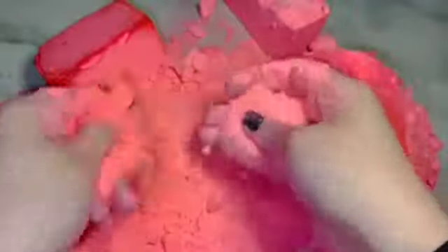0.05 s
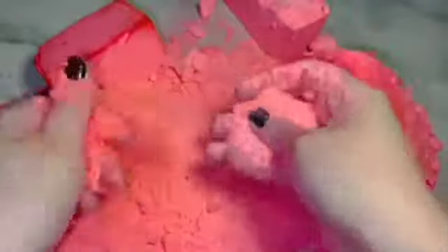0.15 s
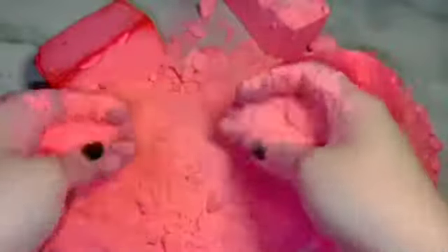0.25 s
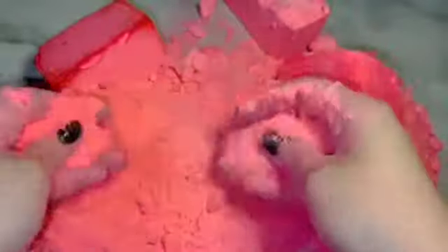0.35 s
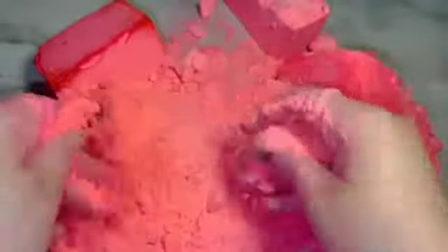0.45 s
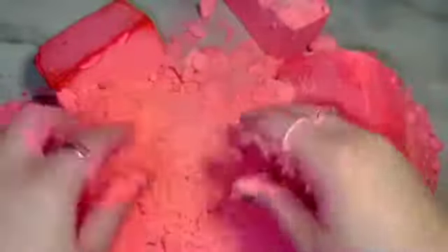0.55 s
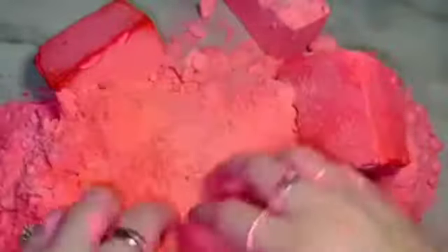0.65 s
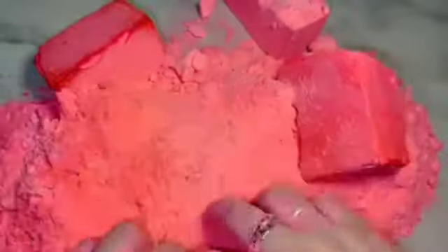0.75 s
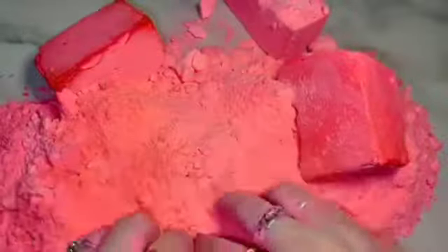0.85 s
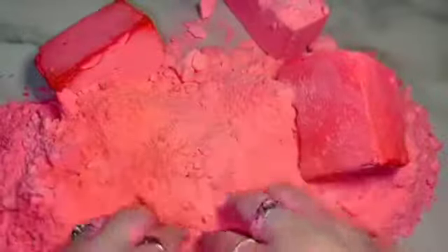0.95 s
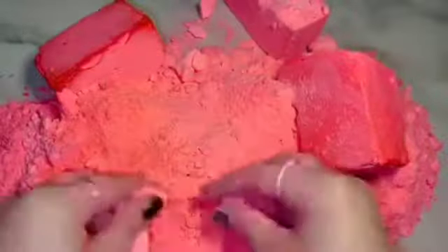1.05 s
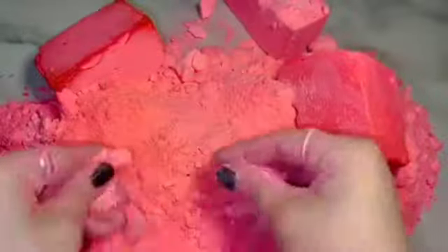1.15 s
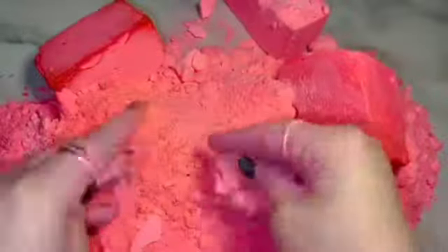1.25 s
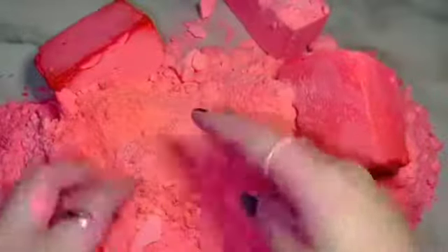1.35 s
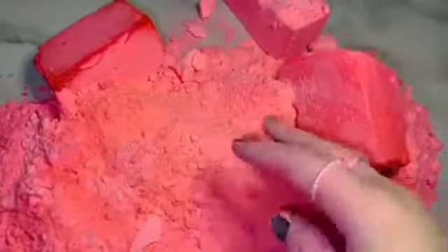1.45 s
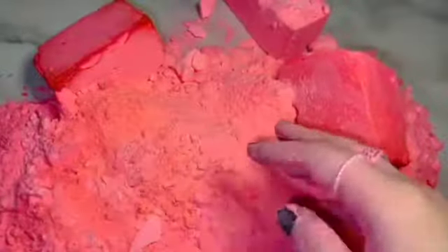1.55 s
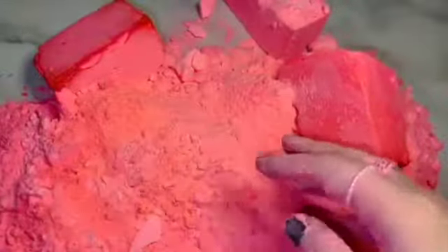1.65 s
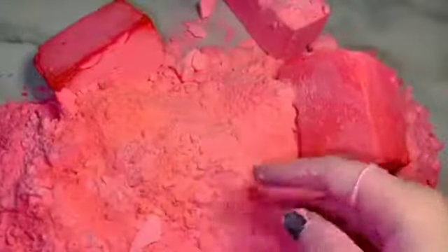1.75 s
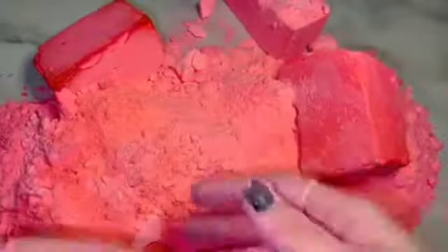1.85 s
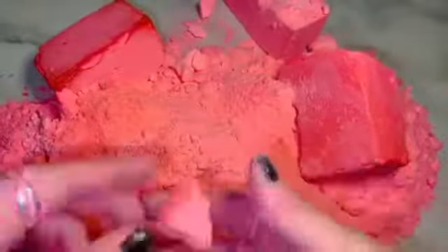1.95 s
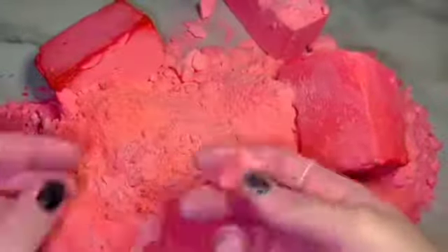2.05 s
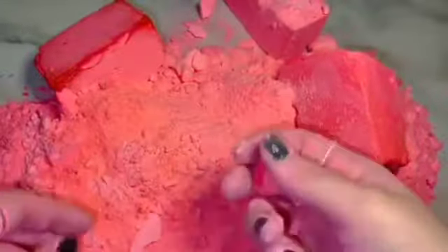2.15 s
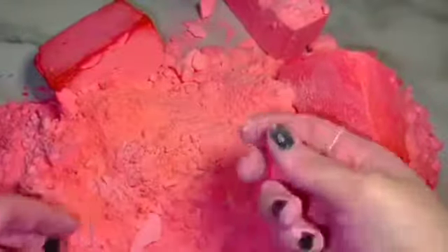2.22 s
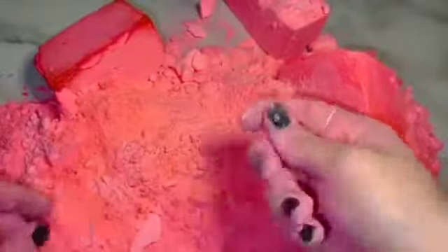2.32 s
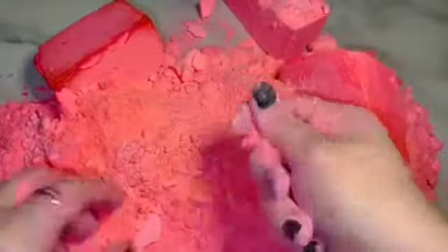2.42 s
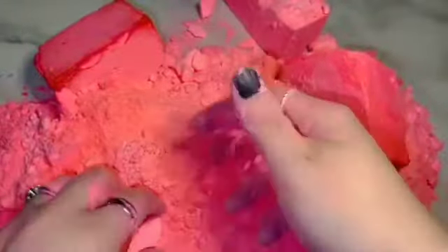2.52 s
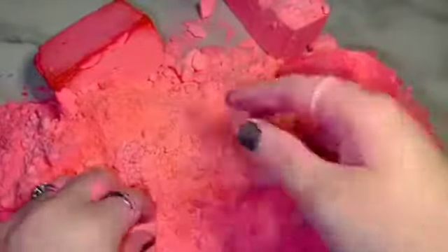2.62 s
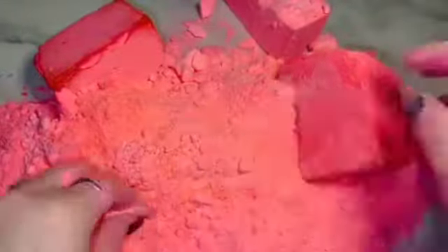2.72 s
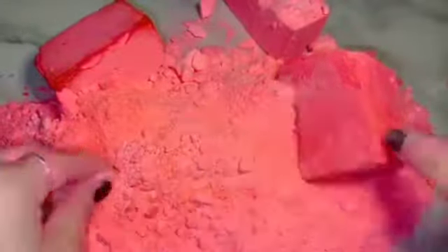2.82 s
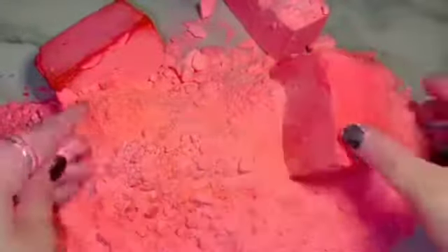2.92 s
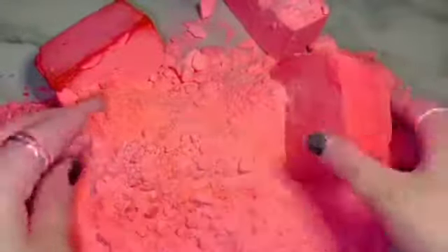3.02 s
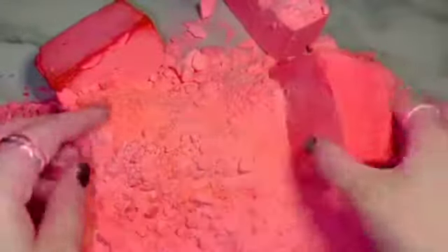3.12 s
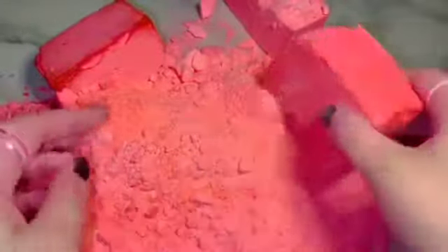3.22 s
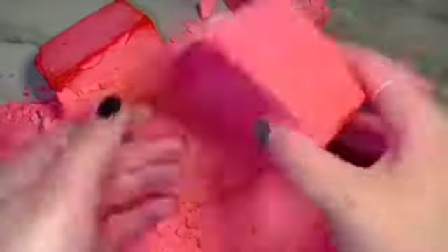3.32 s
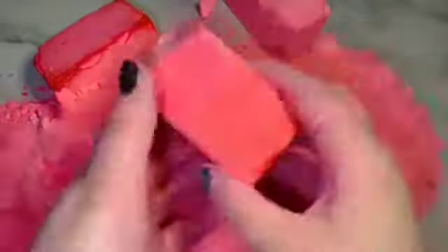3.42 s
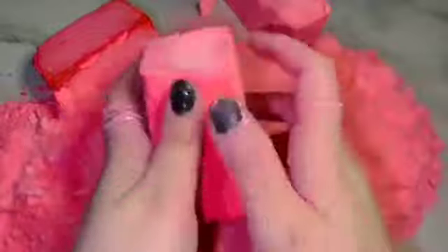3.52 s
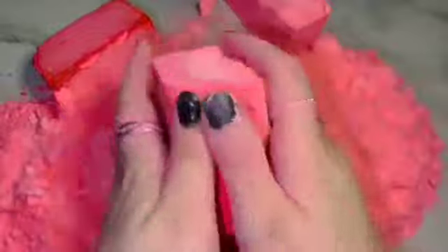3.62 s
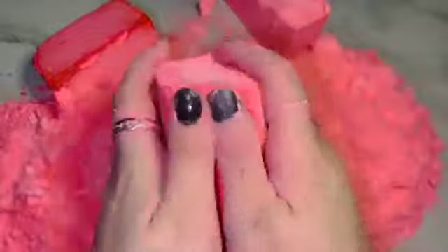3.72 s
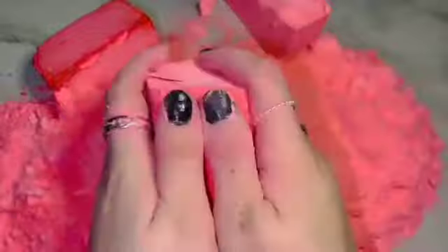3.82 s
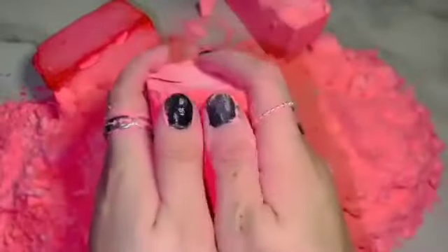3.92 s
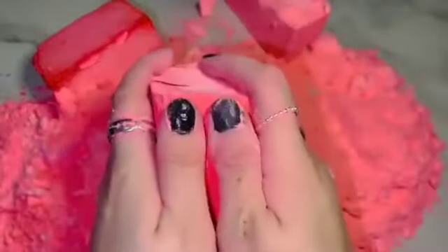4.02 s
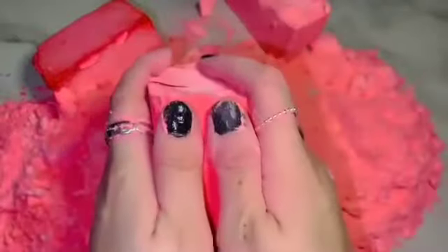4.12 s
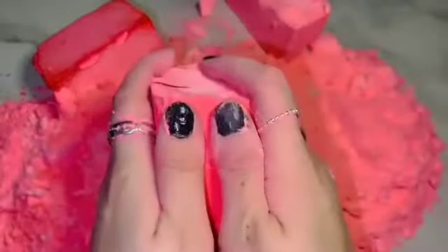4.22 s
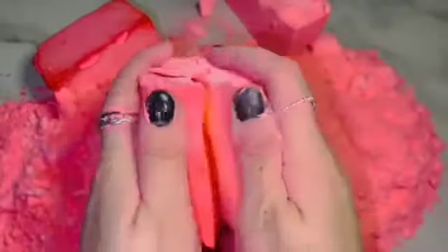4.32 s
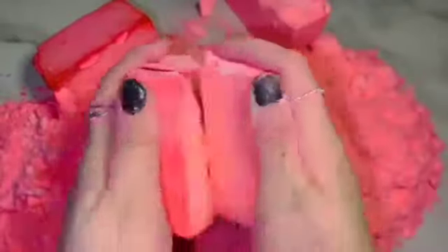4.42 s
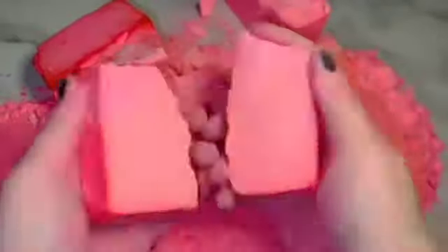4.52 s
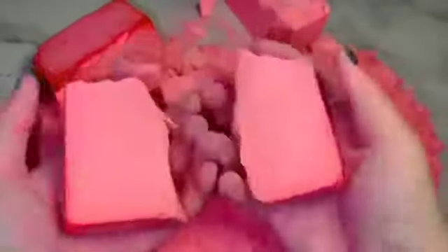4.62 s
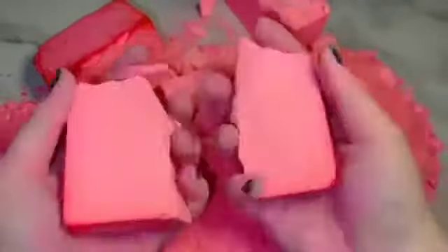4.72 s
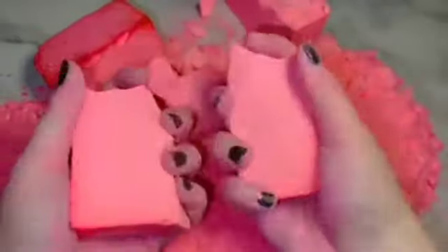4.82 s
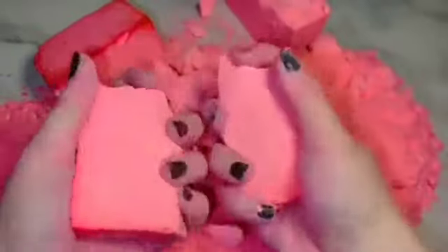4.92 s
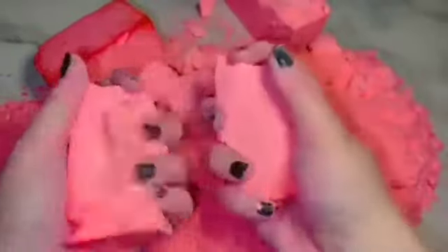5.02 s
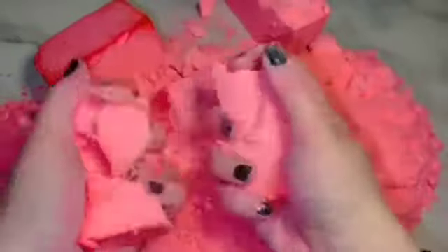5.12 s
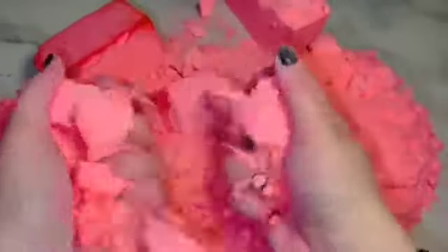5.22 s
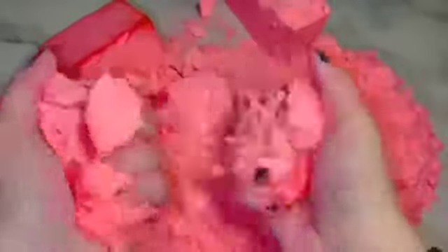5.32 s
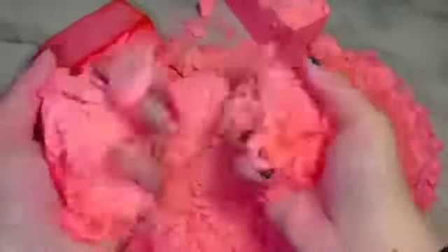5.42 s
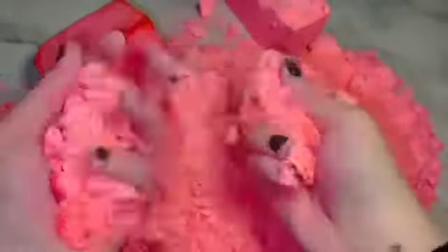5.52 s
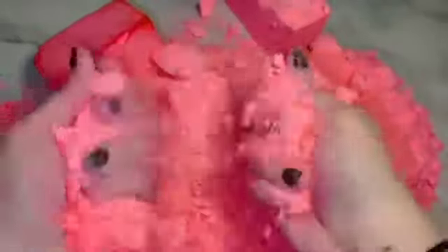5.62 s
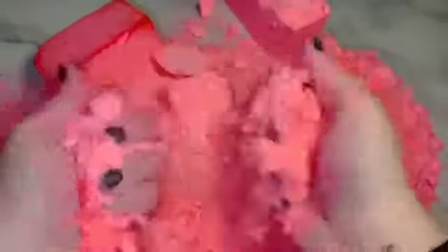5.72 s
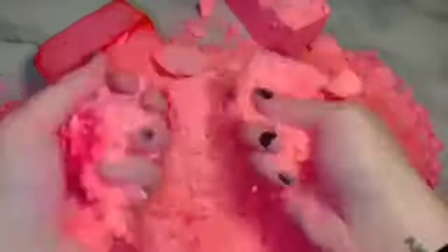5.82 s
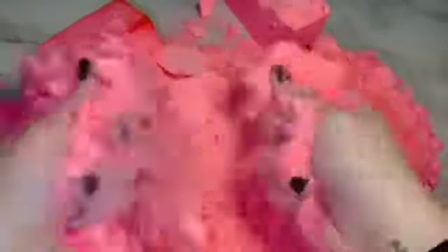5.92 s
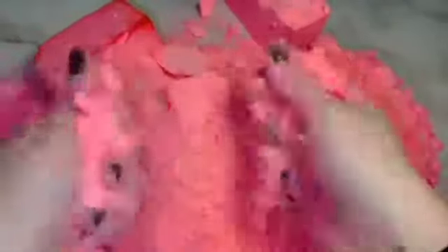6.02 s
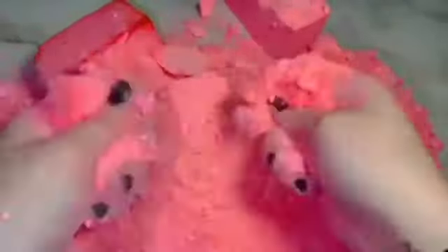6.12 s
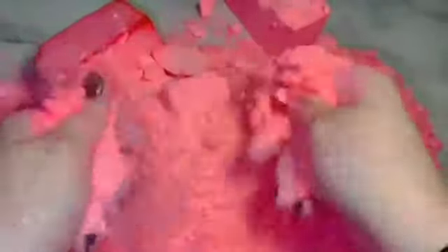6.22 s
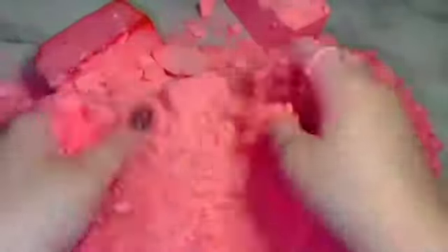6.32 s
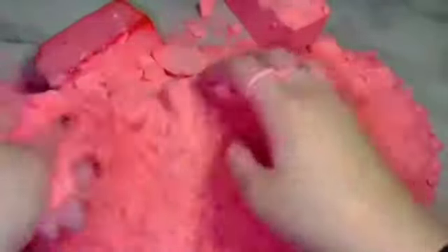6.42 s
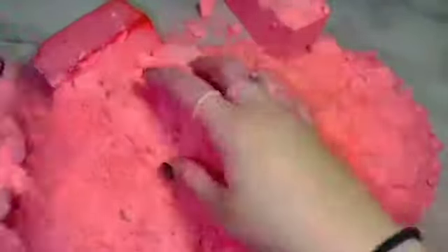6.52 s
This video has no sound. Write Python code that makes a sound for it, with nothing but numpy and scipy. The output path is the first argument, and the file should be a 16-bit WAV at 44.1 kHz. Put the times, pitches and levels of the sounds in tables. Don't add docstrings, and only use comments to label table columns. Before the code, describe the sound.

Close to a phone microphone in a quiet, low-humming room, hands rub loose chalk powder in short hissing, gritty strokes with tiny ticks and crumb patter. A chalk block is lifted and gripped with bright dry slips and a thin ringing scrape. After a pause it snaps cleanly with a dull thud, then the halves burst in loud sharp cracks and grind down into crackling crumbs.

```python
import sys
import numpy as np
from scipy import signal
from scipy.io import wavfile
from scipy.ndimage import uniform_filter1d

SR = 44100
rng = np.random.default_rng(int(sys.argv[2]) if len(sys.argv) > 2 else 0)


def transcribe(u):
    v = np.clip(np.atleast_2d(u).T, -1, 1)
    q = np.round(v * 32767).astype(np.int16)
    wavfile.write(sys.argv[1], SR, q)


def convert_level_to_amplitude(level_db):
    exponent = np.asarray(level_db, float) / 20
    return 10 ** exponent


N = 288855

LEAD = 0.008
TOUCH_S, LIFT_S = 0.02, 0.03


def evened(x):
    return x / np.sqrt(np.mean(x ** 2) + 1e-20)


def add(mix, s, sound):
    part = mix[round(s * SR):][:len(sound)]
    part += sound[:len(part)]


def coloured(x, points, size=4096):
    f, db = np.transpose(points)
    bin_hz = abs(np.fft.fftfreq(size, 1 / SR))
    log_gain = np.interp(np.log(bin_hz + 1), np.log(f), db) * np.log(10) / 20
    taps = np.fft.ifft(np.exp(np.conj(signal.hilbert(log_gain)))).real
    return signal.oaconvolve(x, taps[:size // 2])[:len(x)]


def resonate(x, hz, width):
    return signal.lfilter(*signal.iirpeak(min(hz, SR / 3), hz / width, SR), x)


def high_passed(x, order, hz):
    return signal.lfilter(*signal.butter(order, hz, "high", fs=SR), x)


def patchy(x, depth_db, bins=9, frames=14):
    z = signal.stft(x, SR, nperseg=512)[2]
    field = rng.standard_normal(z.shape[::-1]).T
    field = uniform_filter1d(field, int(bins), 0)
    field = uniform_filter1d(field, int(frames), 1)
    return signal.istft(z * convert_level_to_amplitude(depth_db * evened(field)), SR, nperseg=512)[1][:N]


def grains(per_s, spread_db, flicker_db, flicker_s):
    clumps = evened(uniform_filter1d(rng.standard_normal(N), int(flicker_s * SR)))
    size = convert_level_to_amplitude(spread_db * np.minimum(rng.exponential(1, N), 5) + flicker_db * clumps)
    return size * rng.standard_normal(N) * (rng.random(N) < per_s / SR)


def knock(start_hz, end_hz, length):
    t = np.arange(int(length * SR) + 8) / SR
    hz = 1 / (1 / start_hz + (1 / end_hz - 1 / start_hz) * t / length)
    wave = np.sin(2 * np.pi * np.cumsum(hz) / SR) * np.sin(np.pi * (t / t[-1]) ** 0.58) ** 0.68
    return wave / abs(wave).max()


def stroke_gain(layer):
    # (full contact [s], length [s], pressure [dB], swell [dB], lumpiness [dB])
    rubs = [(0, 0.041, -66.5, -0.5, 2), (0.055, 0.029, -82, -7, 14), (0.117, 0.057, -71.5, -3, 0),
            (0.2, 0.072, -72, 1, 0), (0.294, 0.2, -63.5, -4.5, -6), (0.524, 0.071, -72.5, -9, 5.5),
            (0.625, 0.27, -66.5, 2.5, -11), (.93, 0.095, -83, 4, 12), (1.023, 0.078, -72, 0, 3),
            (1.117, 0.074, -71.5, 0.5, 6.5), (1.21, 0.067, -80, -4, 4), (1.29, 0.053, -71, 6.5, -2),
            (1.376, 0.056, -69, 4, -11), (1.449, 0.22, -61, -3, -13.5), (1.742, 0.13, -73.5, -11.5, -26),
            (1.992, 0.027, -70.5, -16, -40), (2.126, 0.12, -73, -11, -42), (2.304, 0.1, -79, 0, -22),
            (2.406, 0.16, -65.5, -8, -26), (2.609, .12, -61.5, -5, -14.5), (2.745, 0.073, -73, 1.5, -1.5),
            (3.05, 0.031, -68.5, -0.5, -1.5), (3.095, 0.077, -64, -7, -39)]
    # (full contact [s], length [s], pressure [dB], swell [dB], lumpiness [dB])
    grips = [(3.26, 0.21, -64, -1, -17.5), (3.493, 0.098, -66.5, -4.5, -42),
             (3.59, 0.29, -53.5, -6.5, -23.5), (3.632, 0.048, -53.5, 5, -46), (3.884, .15, -67.5, 2, -12.5),
             (4.498, 0.33, -79.5, -5, -0.5), (4.644, 0.074, -76.5, 7, -26), (4.724, 0.076, -59.5, 6, -23),
             (4.839, 0.063, -60.5, -5.5, -36), (4.914, 0.035, -74, 1, -23), (4.958, 0.084, -63, 4.5, -12),
             (5.072, 0.039, -70.5, -6.5, 6), (5.155, 0.076, -87, 13.5, 3), (5.336, 0.076, -64.5, -2, 8),
             (5.422, 0.14, -61.5, -3, 7.5), (5.58, 0.07, -68, 0, 7.5), (5.659, 0.051, -67, -2, 9),
             (5.724, 0.081, -65.5, 3.5, 6), (5.83, 0.062, -57.5, 1.5, 1.5), (5.927, 0.13, -66.5, 2, 7),
             (6.059, 0.16, -65.5, 0, 9.5), (6.236, 0.035, -70, -2, 4), (6.3, 0.09, -66, 0.5, 5),
             (6.405, 0.18, -76, 6, 5.5)]
    # (offset [dB], share of the lumpiness [1])
    layers = [
        (3, -0.0025),
        (-1, 0.19),
        (-2.1, 1),
    ]
    offset_db, share = layers[layer]
    t = np.arange(0, N, 32) / SR
    power = convert_level_to_amplitude(-89) ** 2
    for s, length, db, swell_db, lumps_db in rubs + grips:
        away = np.maximum(s - t, 0) / TOUCH_S + np.maximum(t - s - length, 0) / LIFT_S
        swell = swell_db * np.clip((t - s) / length, 0, 1)
        power = power + convert_level_to_amplitude(db + offset_db + share * lumps_db + swell - 20 * away) ** 2
    return np.interp(np.arange(N) / SR, t, np.sqrt(power))


def hum():
    # (frequency [Hz], level per Hz [dB])
    hum_spectrum = [(12, -37.5), (20, -22.5), (71, -0.5), (137, -14.5), (179, -11.5), (248, -13.5),
                    (292, -21.5), (316, -19.5), (415, -32.5), (515, -29), (657, -32), (773, -44),
                    (934, -43), (1260, -53), (12900, -46.5), (16800, -86), (22000, -120)]
    rumble = evened(coloured(rng.standard_normal(N), hum_spectrum, size=8192))
    rumble = patchy(rumble, 1.7, bins=2, frames=25)
    rumble = patchy(rumble, 2.5, bins=3, frames=7)
    shake = evened(resonate(resonate(rng.standard_normal(N), 130, 150), 120, 260))
    return convert_level_to_amplitude(-65.5) * rumble + convert_level_to_amplitude(-23.5) * stroke_gain(2) ** 0.64 * shake


def dust():
    # (frequency [Hz], level [dB])
    dust_spectrum = [(2500, -42.5), (4500, -10), (6500, 2), (10000, -4), (13000, -0.5)]
    return evened(coloured(grains(19000, 3.1, 2.03, 0.021), dust_spectrum))


def grit():
    # (frequency [Hz], level [dB])
    grit_spectrum = [(900, -27), (1900, -5.5), (3000, -2.5), (4500, -5), (6500, -11)]
    scrape = evened(coloured(grains(12000, 1.1, 2.1, 0.0093), grit_spectrum))
    t = np.arange(N) / SR
    held = (t > 3.24) & (t < 4.05)
    return np.where(held, high_passed(scrape, 4, 2250), scrape)


def crumbs(count=16):
    # (frequency [Hz], level [dB])
    crumb_spectrum = [(200, 3.5), (500, -9.5), (1200, -1.5), (2400, 1), (4000, -13.5), (8000, -39.5)]
    pitches, cycle_counts = np.geomspace(350, 2600, count), rng.uniform(1.0, 4.14, count)
    falls = 0
    for hz, cycles in zip(pitches, cycle_counts):
        impacts = grains(150, 2.1, 1.5, 0.012)
        falls = falls + signal.oaconvolve(impacts, knock(1.433 * hz, 0.75 * hz, cycles / hz))[:N]
    return evened(coloured(falls, crumb_spectrum))


def crackle(count=8):
    pops = 0
    for hz in np.geomspace(900, 6000, count):
        splits = grains(25, 1.8, 3.6, 0.018)
        pops = pops + signal.oaconvolve(splits, knock(1.25 * hz, 0.42 * hz, 1.6 / hz))[:N]
    return evened(pops)


def block_ring():
    # (frequency [Hz], bandwidth [Hz], level [dB], start [s], damped from [s])
    block_modes = [(1450, 90, -11, 2.5, 3.45), (2470, 44, 2, 3.27, 3.49), (4030, 300, -3, 3.25, 3.5),
                   (1450, 70, -8.5, 3.59, 3.87), (2477, 49, 1, 3.59, 3.96), (3440, 290, -1, 2.8, 3.78),
                   (4060, 200, -1, 3.59, 4.2), (5930, 240, 3, 3.6, 3.9), (6960, 280, -3, 3.63, 2.8),
                   (1450, 500, 0, 0.98, 1.4), (2050, 370, 2, 2.63, 2.73), (5700, 520, 7, 3.09, 3.18),
                   (4070, 770, 0.5, 4.74, 4.81)]
    t = np.arange(N) / SR
    ring = np.zeros(N)
    for hz, width, db, start, end in block_modes:
        mode = evened(resonate(grains(6000, 1.9, 3.3, 0.02), hz, width))
        ring += convert_level_to_amplitude(db) * mode * np.clip(np.minimum(t - start, end - t) / TOUCH_S, 0, 1)
    return ring


def powder():
    hiss = convert_level_to_amplitude(1.15) * stroke_gain(0) * dust()
    scrape = convert_level_to_amplitude(-0.1) * stroke_gain(1) * (grit() + convert_level_to_amplitude(-3.5) * block_ring())
    patter = stroke_gain(2) * (convert_level_to_amplitude(0.14) * crumbs() + convert_level_to_amplitude(-14.0) * crackle())
    return patchy(hiss + scrape + patter, 2.18, bins=7.9, frames=16)


def burst(x, rise, life):
    t = np.arange(len(x)) / SR - LEAD
    after = np.maximum(t + 0.001, 0)
    lead_in = convert_level_to_amplitude(-19.0) * np.exp(-abs(t) / 0.0021)
    x = x * ((1 - np.exp(-(after / rise) ** 2)) * convert_level_to_amplitude(-60 * after / life) + lead_in)
    return x / abs(x).max()


def crack(db, body_db, treble_db, hz, t60):
    noise = rng.standard_normal(3000)
    middle = convert_level_to_amplitude(-4.0) * burst(resonate(noise[::-1], hz, 2.6 * hz), 0.0016, t60)
    add(middle, LEAD - 0.9 / hz, np.sign(noise[0]) * knock(1.6 * hz, 0.7 * hz, 2.4 / hz))
    treble = burst(high_passed(noise, 2, 5000), 0.00071, 0.9 * t60)
    body = burst(resonate(resonate(noise, 284, 660), 350, 1000), 0.0027, 1.32 * t60)
    return convert_level_to_amplitude(db) * (middle + convert_level_to_amplitude(treble_db - 0.5) * treble + convert_level_to_amplitude(body_db + 1.0) * body)


def cracks():
    # (time [s], peak [dB], centre [Hz], treble [dB])
    ticks = [(.1276, -53, 1240, 0), (.134, -43, 1830, 1.5), (.529, -34.5, 2600, -29), (.5581, -42, 1400, 3),
             (.7058, -54, 1950, -15), (.764, -53.5, 1900, 7), (.9461, -55, 1150, -18),
             (.9625, -54, 1000, -24), (1.0035, -51.5, 2560, -23), (1.308, -59, 1230, 10.5),
             (1.3788, -54.5, 2460, 7), (1.4353, -58, 1020, -13), (1.5966, -52.5, 1720, -11),
             (2.1889, -65.5, 1290, 18), (2.3407, -64, 2880, 9.5), (2.4629, -45, 2600, 6),
             (2.4704, -35.5, 2320, -3), (2.4783, -32.5, 3120, -19), (2.498, -51, 2480, 7),
             (2.5078, -45.5, 2650, 11), (2.5128, -40.5, 2600, -8), (2.5193, -42, 2726, -8),
             (2.6281, -46.5, 3240, 2), (2.79, -59, 2000, -12), (2.8095, -55, 1600, 0),
             (2.82, -59, 1210, 12), (2.9027, -70, 1340, 16.5), (2.9134, -67, 1450, 14.5),
             (2.582, -56, 3045, -19), (3.0516, -57.5, 1770, 3), (4.0098, -51, 2610, 7),
             (4.017, -60.5, 1210, 12)]
    # (time [s], peak [dB],
    # centre [Hz], treble [dB])
    chips = [(.199, -62, 2050, -7), (.303, -62, 830, -8), (.316, -59.5, 865, -8), (.474, -59, 940, -5),
             (.665, -58, 1320, -10), (.742, -58, 2370, 0), (.81, -55.5, 2120, -3), (.883, -75, 2230, 3),
             (.952, -59, 790, -20), (.979, -57, 800, -20), (1.052, -61, 1420, -5), (1.12, -64, 1510, -8),
             (1.147, -55, 1500, -11), (1.213, -62, 920, -15), (1.297, -60, 3030, -5),
             (1.327, -53, 2180, -10), (1.345, -61, 1200, -12), (1.391, -60, 2400, -5),
             (1.413, -54.5, 2190, -8), (1.495, -54, 2890, 0), (1.602, -57, 1360, -16),
             (4.4435, -69, 3500, 9), (5.2335, -28, 1300, -2), (5.365, -52, 700, -5), (5.563, -47, 980, -15),
             (5.595, -52, 2500, -12), (5.688, -54, 980, -12), (5.762, -64, 830, -10),
             (5.803, -60, 1070, -10), (5.815, -51, 990, -8), (5.879, -55, 2310, -5), (5.895, -52, 880, -8),
             (5.983, -49, 1330, -15), (6.019, -48, 820, -5), (6.117, -61, 1800, -10),
             (6.133, -50.5, 850, -12), (6.1615, -50, 1200, -12), (6.257, -62, 1100, -14),
             (6.314, -60, 910, -8), (6.364, -51, 890, -12), (6.371, -57, 1510, -8), (6.437, -57, 990, -10),
             (6.505, -57, 1500, -10)]
    # (time [s], peak [dB], centre [Hz], treble [dB])
    snaps = [(4.4492, -23, 2400, 6.5), (4.4585, -38.5, 2320, -8), (4.4507, -21.5, 1570, -14),
             (4.5633, -44, 1210, -33), (4.5699, -48, 1850, -26), (4.9691, -56.5, 1450, 13),
             (4.9894, -70, 1600, 29), (5.0657, -39.5, 3960, -5), (5.0718, -50, 3820, 15.5),
             (5.0844, -47.5, 1340, -21), (5.05, -62, 2500, 3), (5.1494, -61, 1700, 16),
             (5.1946, -54, 2820, 9), (5.2253, -15, 2160, 6.5), (5.2283, -24.5, 2020, 12.5),
             (5.2314, -31, 1720, 18.5), (5.2384, -27.5, 1420, -15), (5.2447, -25, 1180, -23),
             (5.2476, -42, 1320, -9), (5.3162, -15, 3220, 2.5), (5.3355, -37.5, 960, -16),
             (5.3424, -32.5, 1900, -15), (5.349, -40, 1290, 11.5), (5.357, -36.5, 1120, 1),
             (5.402, -30, 1480, 9), (5.407, -33, 1520, 11.5), (5.4099, -34, 1900, 12),
             (5.4146, -28, 2050, -1), (5.4206, -32, 1750, -23)]
    # (time [s], peak [dB], centre [Hz], treble [dB])
    splits = [(5.478, -30.5, 1870, -26), (5.486, -33, 1690, -6), (5.5044, -37, 1780, 3),
              (5.5171, -27, 1420, 0.5), (5.5285, -38, 810, -1), (5.5379, -53, 1420, -8),
              (5.5472, -44.5, 1010, -20), (5.6592, -47, 1970, -13), (5.8319, -56, 1210, -4),
              (5.854, -48, 1970, 1), (5.9335, -41.5, 990, -23), (5.9481, -38.5, 1300, -26),
              (5.9958, -45, 1390, -9), (6.028, -55, 1260, -8), (6.0695, -50, 920, 3), (6.1, -48, 1140, 2),
              (6.1544, -42, 2200, -25), (6.188, -51, 3600, -3), (6.211, -46, 3700, -4),
              (6.334, -46, 1950, 5), (6.34, -50, 1280, -2), (6.387, -59, 1700, -20),
              (6.417, -50, 1420, -15), (6.4304, -45, 1540, -29), (6.49, -58, 1460, -19),
              (6.5277, -52.5, 1050, -28)]
    mix = np.zeros(N)
    # body re peak [dB] and t60 [s], both at 1.5 kHz
    kinds = (ticks, -3, 0.021), (chips, -10.5, 0.018), (snaps, -2.5, 0.013), (splits, -4, 0.018)
    for events, body_db, t60 in kinds:
        for s, db, hz, treble_db in events:
            pitch = hz / 1500
            lump_body_db = body_db - 13.5 * np.log2(pitch)
            add(mix, s - LEAD, crack(db, lump_body_db, treble_db, hz, t60 * pitch ** -0.63))
    return mix


def thuds():
    # (time [s], peak [dB], first pitch [Hz], last pitch [Hz], length [s])
    thud_events = [(0.997, -54, 322, 198, 0.019), (0.402, -37, 940, 240, 0.0062),
                   (0.559, -60, 289, 143, 0.012), (0.951, -55.5, 406, 186, 0.022),
                   (3.049, -55, 113, 67, 0.043), (3.577, -45, 138, 96, 0.015),
                   (3.718, -48.5, 95, 56, 0.021), (4.001, -53, 153, 87, 0.027),
                   (4.452, -23, 440, 98, 0.012), (4.457, -47, 147, 99, 0.052),
                   (4.566, -49.5, 880, 294, 0.015), (4.985, -48.5, 444, 250, 0.0091),
                   (5.227, -29, 408, 224, 0.0093), (5.243, -36, 420, 240, 0.013),
                   (5.269, -36, 166, 148, 0.026), (5.293, -37, 84.5, 71, 0.04),
                   (5.333, -46.5, 385, 240, 0.035), (5.335, -37.5, 1200, 750, 0.0048),
                   (6.525, -52.5, 960, 850, .01), (6.025, -48, 480, 377, 0.013),
                   (5.861, -47, 350, 240, 0.014), (5.408, -35.5, 410, 189, 0.0094),
                   (5.515, -26, 490, 388, 0.016), (5.543, -38.5, 493, 406, 0.013),
                   (5.938, -57, 616, 296, 0.034), (5.95, -40, 1350, 1290, 0.0092),
                   (5.993, -46, 1450, 1230, 0.011), (6.024, -49.5, 516, 210, 0.013),
                   (6.361, -54, 198, 108, 0.037)]
    mix = np.zeros(N)
    for s, db, start_hz, end_hz, length in thud_events:
        add(mix, s, convert_level_to_amplitude(db) * knock(start_hz, end_hz, length))
    return mix


def scuffs():
    # (time [s], peak [dB], length [s], lowest frequency [Hz])
    scuff_events = [
        (3.629, -40, 0.059, 5500),
        (3.672, -49, 0.042, 5460),
        (3.713, -21, 0.014, 8700),
        (3.852, -26.5, 0.038, 8700),
        (3.852, -32, 0.036, 3030),
        (6.031, -34.5, 0.024, 8000),
    ]
    mix = np.zeros(N)
    for s, db, length, hz in scuff_events:
        hiss = evened(high_passed(rng.standard_normal(int(length * SR)), 6, hz))
        swell = np.sin(np.pi * np.linspace(0, 1, len(hiss)) ** 0.87) ** 2.1
        add(mix, s - length / 2, convert_level_to_amplitude(db - 10.5) * hiss * swell)
    return mix


def squeaks():
    # (time [s], peak [dB], pitch [Hz], length [s])
    squeak_events = [
        (5.303, -43, 2080, 0.007),
        (5.556, -56, 2030, 0.03),
    ]
    mix = np.zeros(N)
    for s, db, hz, length in squeak_events:
        t = np.arange(int(length * SR)) / SR
        tone = sum(g * np.sin(2 * np.pi * k * hz * t) for k, g in enumerate((0.3, 0.45, 0.15), 1))
        add(mix, s - length / 2, convert_level_to_amplitude(db) * np.hanning(len(t)) * tone)
    return mix


def room(x, t60=0.17):
    t = np.arange(SR // 4) / SR
    tail = rng.standard_normal(len(t)) * convert_level_to_amplitude(-60 * t / t60) * (t > 0.004)
    tail = coloured(tail, [(300, -8), (2000, -7), (10000, -2)])
    return signal.oaconvolve(x, tail / np.linalg.norm(tail))[:N]


def scene():
    near = powder() + cracks() + thuds() + scuffs() + squeaks()
    return (near + convert_level_to_amplitude(-14) * room(near) + hum())[None]


def starve(x):
    # (start [s], end [s])
    starved_spans = [(.21, .3), (.36, .52), (.63, .76), (.85, 1.02), (1.1, 1.22), (1.3, 1.68), (2.66, 2.84),
                     (3.41, 3.54), (3.91, 4.02), (4.48, 4.53), (4.8, 4.93), (5.26, 5.31), (5.38, 5.4),
                     (5.425, 5.478), (5.57, 6.0), (6.06, 6.25), (6.34, 6.55)]
    hz, t, z = signal.stft(x, SR, nperseg=1024)
    hz = hz[:, None]
    on = sum((t > start) & (t < end) for start, end in starved_spans) > 0
    edges = rng.choice([0, 1], (2, len(t) // 6 + 1), p=[0.7, 0.3])
    low, high = np.repeat(edges, 6, axis=1)[:, :len(t)]
    hole = on & (hz > 8370 + 300 * low) & (hz < 9450 - 500 * high)
    narrow = (high < 1) & ((t < 1.32) | on & (t > 5.5) & (low < 1))
    hole |= narrow & (abs(hz - 4870) < 90)
    return signal.istft(np.where(hole, 0.034 * z, z), SR, nperseg=1024)[1][:N]


def roll_off(x):
    return signal.sosfilt(signal.butter(12, 13060, fs=SR, output="sos"), x)


def record(dry):
    # (frequency [Hz], gain [dB])
    port_response = [(440, -2), (560, -6.5), (750, 1), (4550, -1), (4880, -9), (5200, 0), (8200, -5),
                     (8500, -13), (9300, -7.5), (9600, 0), (10100, 6), (11000, -3.5), (12000, -16),
                     (12300, -23), (12700, -42)]
    mix = starve(coloured(dry[0], port_response))[None]
    return roll_off(mix)


dry = scene()
out = record(dry)
transcribe(out)
```